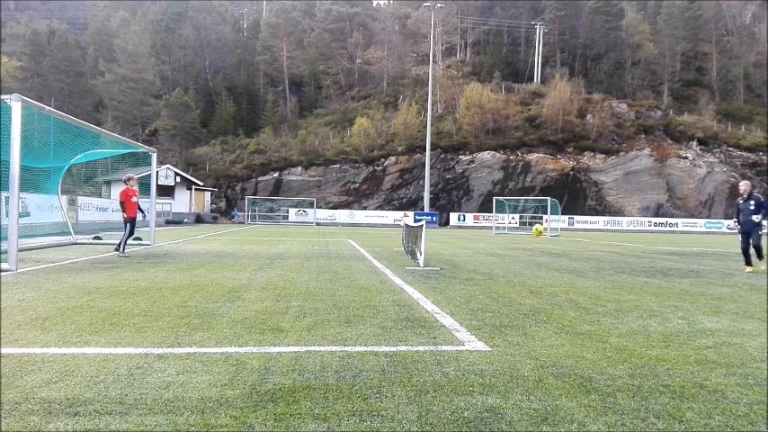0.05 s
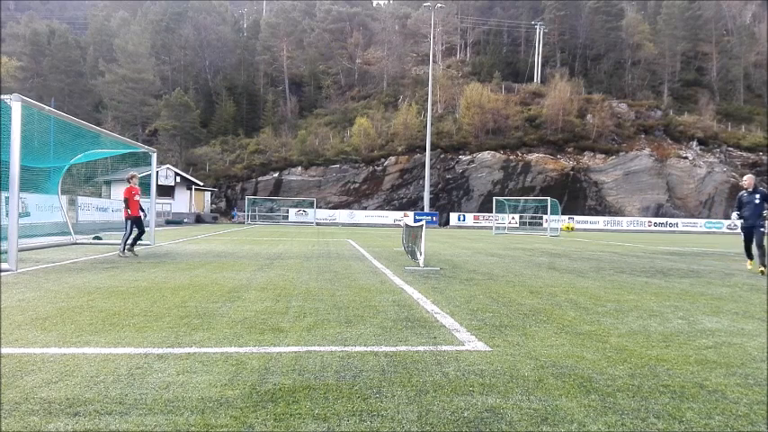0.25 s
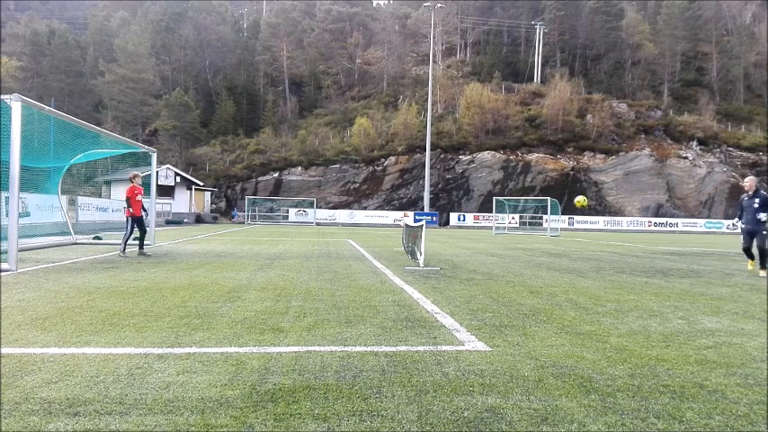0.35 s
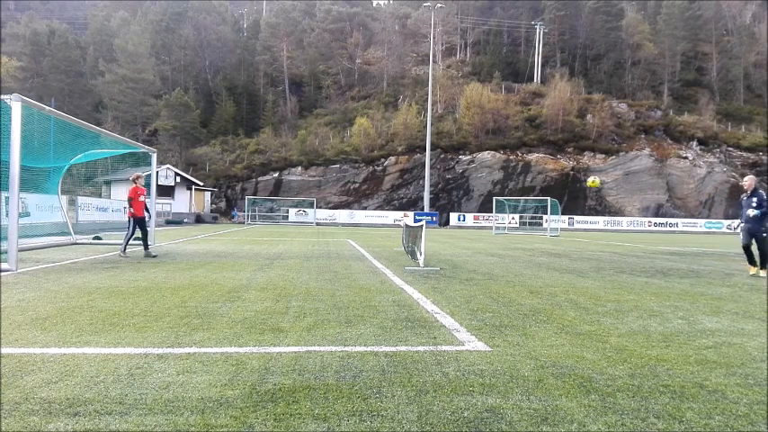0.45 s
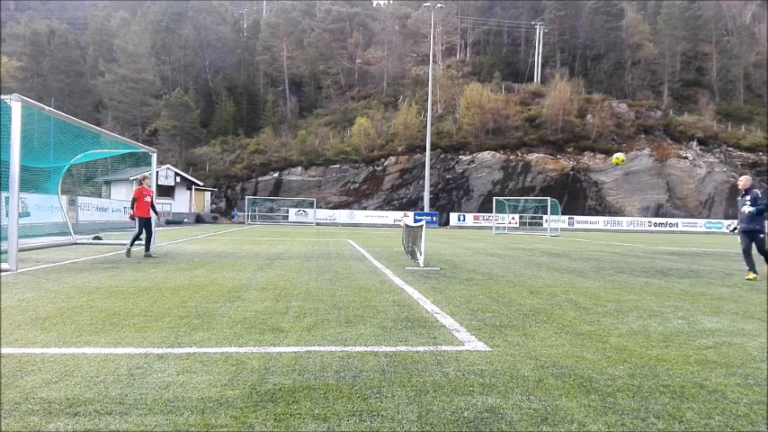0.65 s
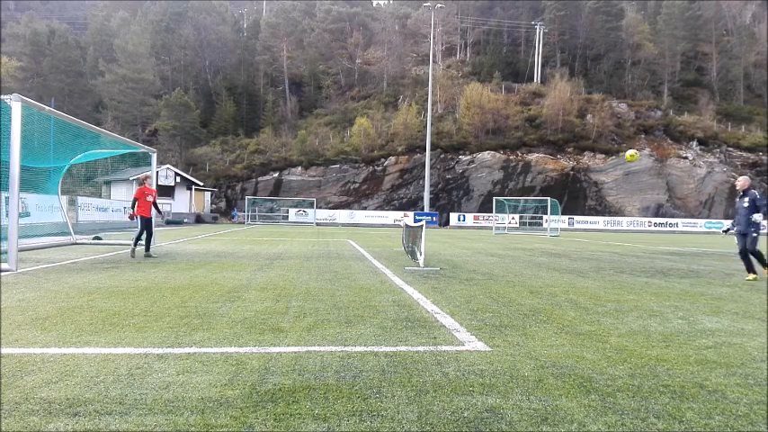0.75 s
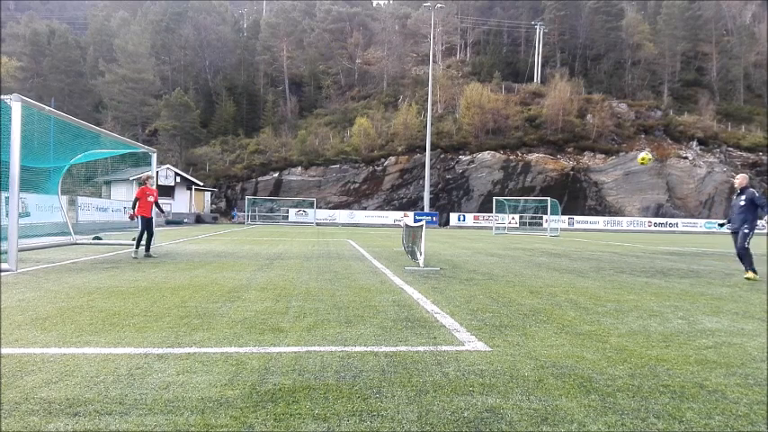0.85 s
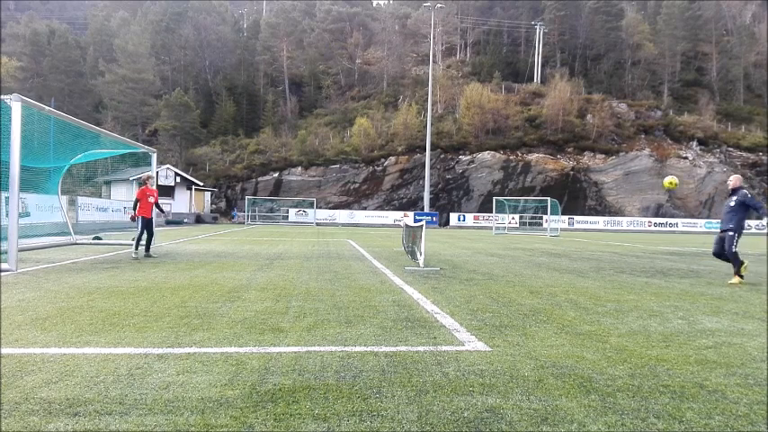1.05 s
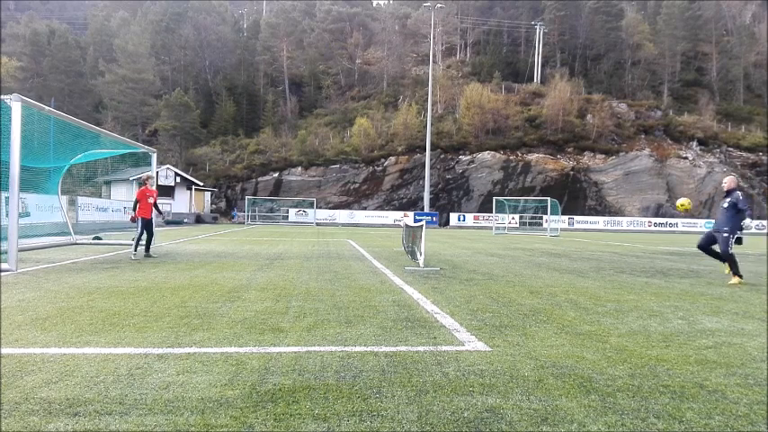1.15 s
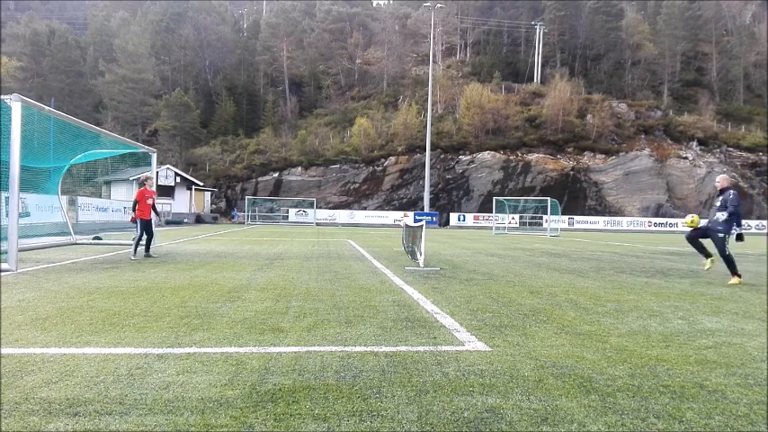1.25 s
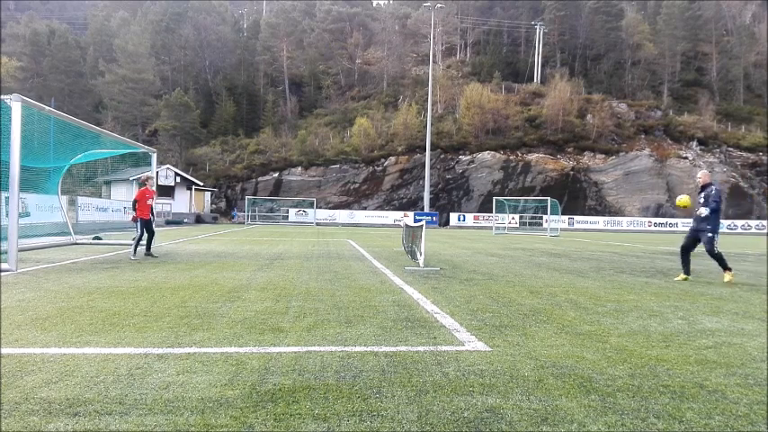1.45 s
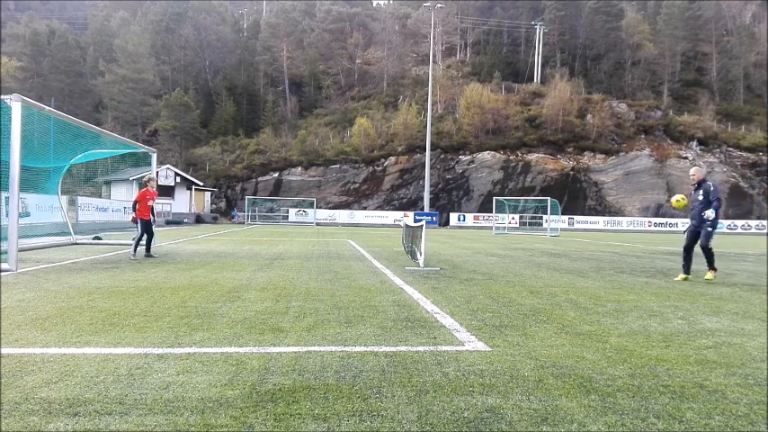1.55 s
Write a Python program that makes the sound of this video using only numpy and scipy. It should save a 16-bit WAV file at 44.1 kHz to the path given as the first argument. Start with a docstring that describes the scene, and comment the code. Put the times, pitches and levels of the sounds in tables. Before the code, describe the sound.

A football bounces with a low thud on artificial turf, then gets a lighter kick.

```python
"""Light air rumbles under a steady hiss; far birds chirp and shoes scuff faintly now and then.
At 0.23 s a football drops on artificial turf with a low thud and a slight crunch of grass.
At 1.33 s a player knocks it up: a lighter thump, with a sharp slap from the ball's skin.
Boards and a rock face around the pitch throw each blow back as dull echoes.
From 1.51 s the kicking foot pads back down."""
import sys
import numpy as np
from scipy import signal
from scipy.fft import rfft, irfft
from scipy.io import wavfile

SR = 44100
rng = np.random.default_rng(int(sys.argv[2]) if len(sys.argv) > 2 else 0)


def persist_wave(psi):
    """Save psi, clipped to +-1, as 16-bit WAV."""
    counts = np.round(np.clip(psi, -1, 1) * 32767).astype(np.int16)
    wavfile.write(sys.argv[1], SR, np.atleast_2d(counts).T)


N = 70560
TIME = np.arange(N) / SR


def from_db(db):
    """Decibels to gain."""
    return 10 ** (np.asarray(db) / 20)


def cut(x, hz, kind, order=2):
    """Butterworth filter."""
    sos = signal.butter(order, np.clip(hz, 10, .45 * SR), kind, fs=SR, output="sos")
    return signal.sosfilt(sos, x + 1e-18)


def swell(centre_s, sigma_s):
    """Gaussian envelope, peak 1."""
    return np.exp(-.5 * ((TIME - centre_s) / sigma_s) ** 2)


def noise(spectrum):
    """Coloured noise, rms 1."""
    hz, db = np.transpose(spectrum)
    bins_hz = np.maximum(np.arange(N // 2 + 1) * SR / N, 1)
    gain = from_db(np.interp(np.log(bins_hz), np.log(hz), db))
    x = irfft(rfft(rng.standard_normal(N)) * gain, N)
    return x / x.std()


def strike(start_s, modes):
    """Damped sines set off by one blow."""
    age = np.maximum(TIME - start_s, 0)
    return sum(from_db(db - 60 * age / t60) * np.sin(2 * np.pi * hz * age) for hz, db, t60 in modes)


# Air spectra. Each row: frequency in Hz, relative density in dB.
HISS_SPECTRUM = [(200, 7), (350, 2.5), (550, -2.5), (800, 0), (1200, 2.5), (1600, 2), (2300, -2.5),
                 (4000, -2.5), (8000, -3.5), (14000, -4.5)]
RUMBLE_SPECTRUM = [(15, -11), (28, -2.5), (45, 6), (70, -6.5), (110, -12), (180, -22.5), (300, -32.5),
                   (700, -57)]
# Breeze strength. Each row: time in seconds, rms level in dB.
RUMBLE_LEVELS = [(0, -62), (.17, -69.5), (.32, -60.5), (.66, -72.5), (.75, -62.5), (.88, -69.5),
                 (1.02, -66.5), (1.11, -65.5), (1.18, -72), (1.45, -68), (1.58, -60)]
def air():
    """Even outdoor hiss and the rumble of a light breeze."""
    hiss = from_db(-76.5) * noise(HISS_SPECTRUM)
    rumble_db = np.interp(TIME, *np.transpose(RUMBLE_LEVELS))
    return hiss + from_db(rumble_db) * noise(RUMBLE_SPECTRUM)


# Chirps. Each row: start and length in seconds, first and last pitch in Hz, level in dB.
BIRD_NOTES = [(.047, 0.037, 5670, 3960, -78), (0.597, 0.068, 5130, 5050, -85.5),
              (1.481, 0.035, 4060, 3870, -84)]
def birds():
    """Thin far notes glide down and level out."""
    out = np.zeros(N)
    for start_s, length_s, from_hz, to_hz, db in BIRD_NOTES:
        progress = np.clip((TIME - start_s) / length_s, 0, 1)
        hz = to_hz + (from_hz - to_hz) * (1 - progress) ** 2.6
        out += from_db(db) * np.sin(np.pi * progress) * np.sin(2 * np.pi * np.cumsum(hz) / SR)
    return out


# Shoe scuffs. Each row: centre in seconds, level in dB, sigma in seconds.
SCUFFS = [(0.146, -84.5, 0.064), (0.498, -77, 0.0047), (0.513, -80.5, 0.043), (0.813, -77.5, 0.008),
          (1.382, -73, 0.0025), (1.504, -76, .003), (1.58, -83.5, 0.017)]
def shoes():
    """Soles brush the plastic grass in short swells."""
    rustle = cut(rng.standard_normal(N), hz=[1080, 1775], kind="band")
    envelope = sum(from_db(db) * swell(centre_s, sigma_s) for centre_s, db, sigma_s in SCUFFS)
    return rustle / rustle.std() * envelope


# Foot contacts. Each row: start in seconds, level before filtering in dB, frequency in Hz.
FOOT_PADS = [(1.5097, -50.5, 375), (1.5198, -57.5, 262), (1.526, -59, 280), (1.5405, -53, 353),
             (1.558, -59, 250), (1.5721, -46.5, 110)]
def footfall(t60_s=0.01, low_hz=70.5, top_hz=427):
    """Heel, sole and toe of the kicking foot pad back down, dull and dead."""
    pads = sum(strike(start_s, [(hz, db, t60_s)]) for start_s, db, hz in FOOT_PADS)
    return cut(cut(pads, top_hz, "low", order=6), low_hz, "high")


def grass(landing_s):
    """Blades and infill crunch under the ball."""
    crunch = cut(rng.standard_normal(N), hz=[660, 1370], kind="band")
    return from_db(-76) * crunch / crunch.std() * swell(landing_s + 0.0083, sigma_s=0.01)


def reflect(x, envelope, low_hz, top_hz):
    """Dense weak reflections in one band; the envelope weights their delays."""
    response = cut(rng.standard_normal(N), [low_hz, top_hz], "band", order=4) * envelope
    band_share = (top_hz - low_hz) / (SR / 2)
    response *= np.sqrt(band_share) / np.linalg.norm(response)  # about unity gain in band
    return signal.fftconvolve(x, response)[:N]


def diffuse(x, low_hz, top_hz, t60_s, onset_s):
    """Reflections that build up and die away."""
    build_up = 1 - np.exp(-(TIME / onset_s) ** 2)
    return reflect(x, build_up * from_db(-60 * TIME / t60_s), low_hz, top_hz)


# Scatter from trees and rock. Each row: octave centre in Hz, gain in dB, T60 in seconds.
SCATTER_BANDS = [(73, -20, 1), (134, -26.5, 0.77), (249, -22.5, 0.4), (434, -16, .3)]
def with_surroundings(x, echoes, wash):
    """Direct sound plus distinct dull echoes, smeared echoes and scatter."""
    distinct = sum(from_db(db) * np.interp(TIME - delay_s, TIME, cut(x, hz, "low", order=4), left=0)
                   for delay_s, db, hz in echoes)
    smeared = sum(from_db(db) * reflect(x, swell(delay_s, sigma_s), low_hz, top_hz)
                  for delay_s, sigma_s, db, low_hz, top_hz in wash)
    scatter = sum(from_db(db) * diffuse(x, hz / np.sqrt(2), hz * np.sqrt(2), t60_s, onset_s=0.015)
                  for hz, db, t60_s in SCATTER_BANDS)
    return x + distinct + smeared + scatter


def thud(start_s, modes, contact_s, low_hz, top_hz):
    """The ball rings when squashed, then more weakly on release; soft contact takes off the top."""
    squash = strike(start_s, modes)
    release = from_db(-15) * strike(start_s + contact_s, modes)
    return cut(cut(squash + release, top_hz, "low", order=6), low_hz, "high")


# Outer cover modes. Each row: frequency in Hz, level before filtering in dB, T60 in seconds.
COVER_MODES = [(3754, -62.5, 0.015), (4870, -70.5, .010)]
def cover_tick(start_s):
    """The ball's outer cover gives a tiny tick."""
    return cut(strike(start_s, COVER_MODES), hz=2304, kind="high")


# Skin and inner air modes. Each row: frequency in Hz, relative level in dB, T60 in seconds.
SKIN_MODES = [(1070, -25, 0.047), (1346, -6.5, .016), (1430, -2, 0.024), (1757, 4, 0.011), (2040, 3, 0.011)]
def skin_slap(start_s, low_hz=1027, top_hz=2304):
    """The slapped skin and the air inside ring brightly, with a short diffuse tail."""
    ring = from_db(-41.5) * strike(start_s, SKIN_MODES)
    slap = cut(cut(ring, low_hz, "high", order=10), top_hz, "low", order=16)
    tail = from_db(-19) * diffuse(slap, low_hz, top_hz, t60_s=0.16, onset_s=0.0051)
    return slap + tail


# Ball modes against the player. Each row: frequency in Hz, relative level in dB, T60 in seconds.
KICK_MODES = [(111.4, -3, 0.036), (168.7, -1, 0.033), (402, -9, 0.016)]
# Distinct echo. Each row: delay in seconds, gain in dB, low-pass cutoff in Hz.
KICK_ECHOES = [(0.05, -9.5, 293)]
# Smeared rock echoes. Each row: delay and sigma in seconds, gain in dB, low and top edge in Hz.
KICK_WASH = [(.065, 0.011, -20, 101, 300), (0.203, .03, -19.5, 128, 298)]
def kick(start_s):
    """The foot squashes the ball: a light echoing thump with a slap and a tick on top."""
    thump = from_db(-31.5) * thud(start_s, KICK_MODES, contact_s=0.0045, low_hz=99, top_hz=317)
    echoing = with_surroundings(thump, KICK_ECHOES, KICK_WASH)
    return echoing + skin_slap(start_s + 0.0008) + cover_tick(start_s + 0.0022)


# Ball modes against the turf. Each row: frequency in Hz, relative level in dB, T60 in seconds.
BOUNCE_MODES = [(98, -0.5, 0.048), (137.7, -4, 0.041), (239, -15, 0.041), (554, -12, 0.015)]
# Distinct echoes. Each row: delay in seconds, gain in dB, low-pass cutoff in Hz.
BOUNCE_ECHOES = [(0.0441, -12.5, 543), (0.0527, -24, 456), (0.063, -22.5, 400), (0.1659, -21.5, 313),
                 (0.225, -25.5, 240), (0.274, -29, 190)]
# Smeared rock echoes. Each row: delay and sigma in seconds, gain in dB, low and top edge in Hz.
BOUNCE_WASH = [(.20, 0.056, -25.5, 110, 300), (.43, 0.05, -31.5, 101, 182)]
def bounce(start_s):
    """Soft turf leaves only the ball's lowest, heavily damped modes."""
    thump = from_db(-16.5) * thud(start_s, BOUNCE_MODES, contact_s=0.00698, low_hz=103.7, top_hz=413)
    return with_surroundings(thump, BOUNCE_ECHOES, BOUNCE_WASH)


def scene():
    """Mono mix, heard beside the goal."""
    landing_s, kick_s = 0.2294, 1.3341
    ball = bounce(landing_s) + grass(landing_s) + kick(kick_s)
    return (ball + footfall() + shoes() + birds() + air())[None]


def record(dry):
    """Steep elliptic low-pass."""
    cutoff_hz = 14300
    return signal.sosfilt(signal.ellip(12, .1, 70, cutoff_hz, fs=SR, output="sos"), dry)


dry = scene()
out = record(dry)
persist_wave(out)
```